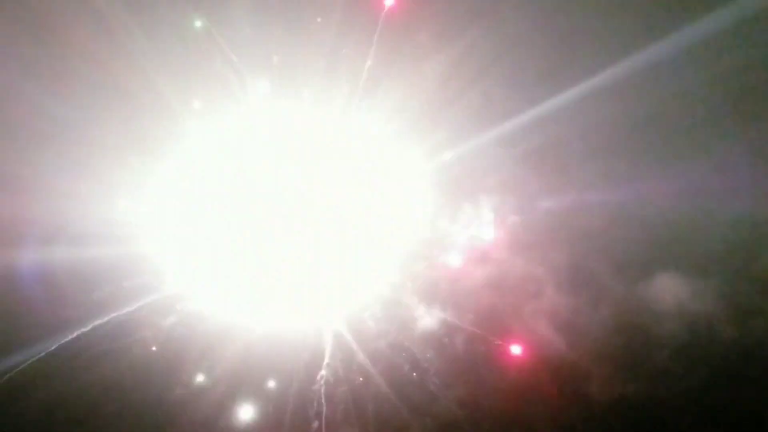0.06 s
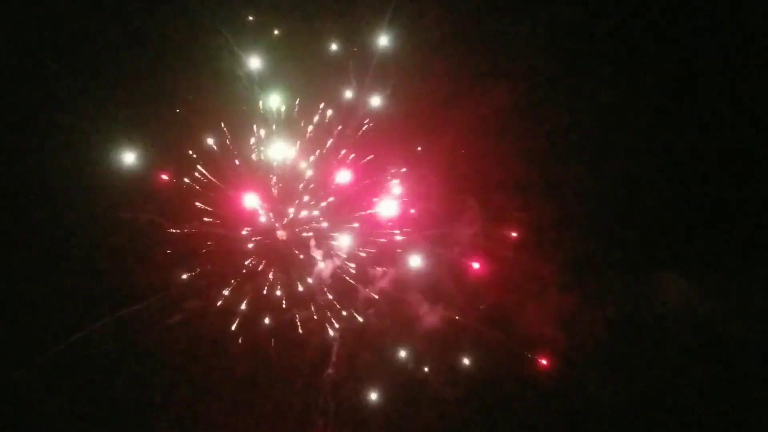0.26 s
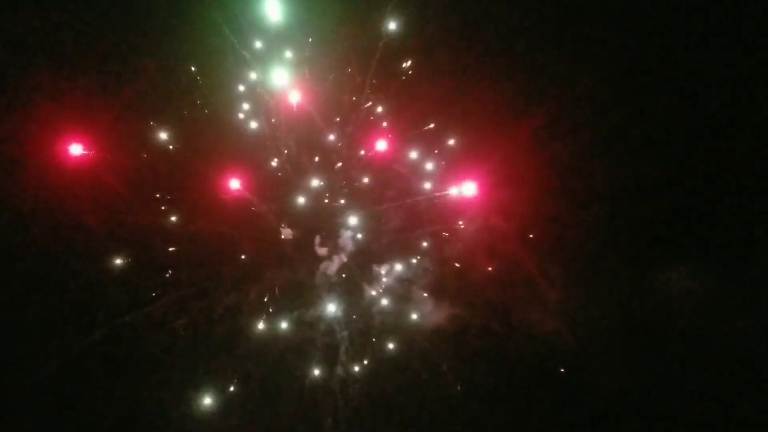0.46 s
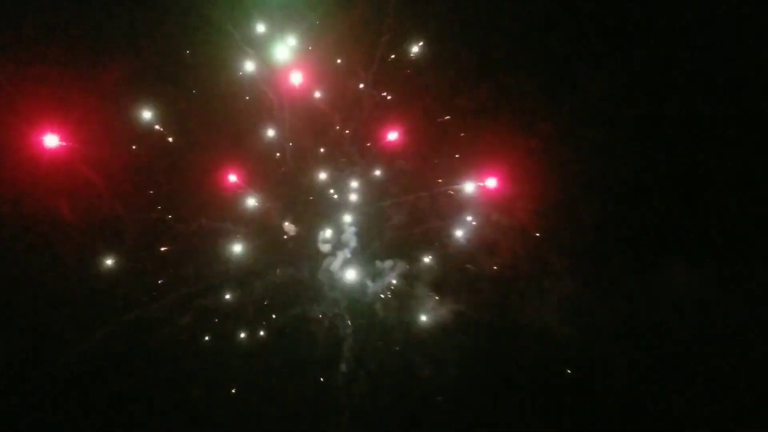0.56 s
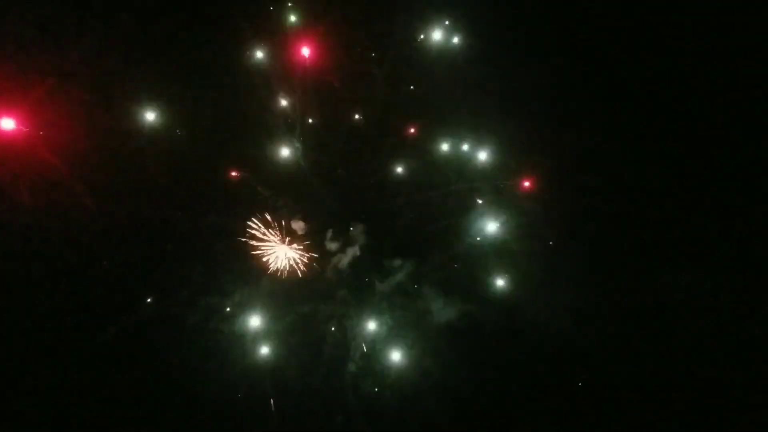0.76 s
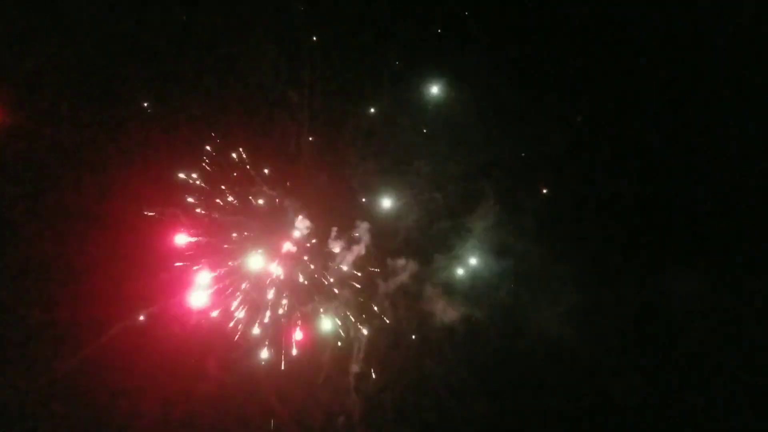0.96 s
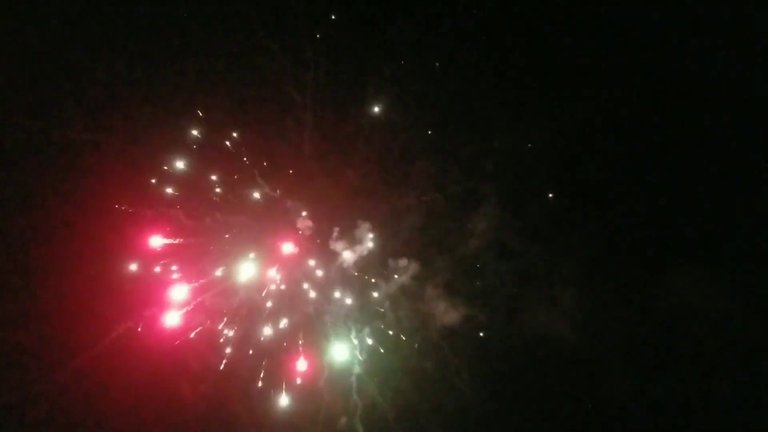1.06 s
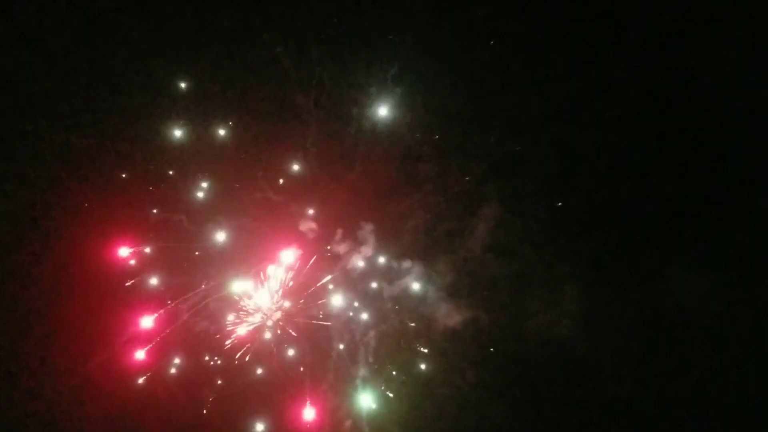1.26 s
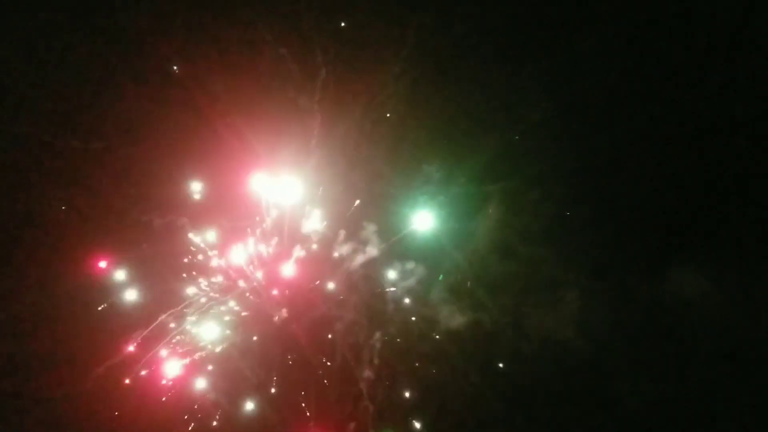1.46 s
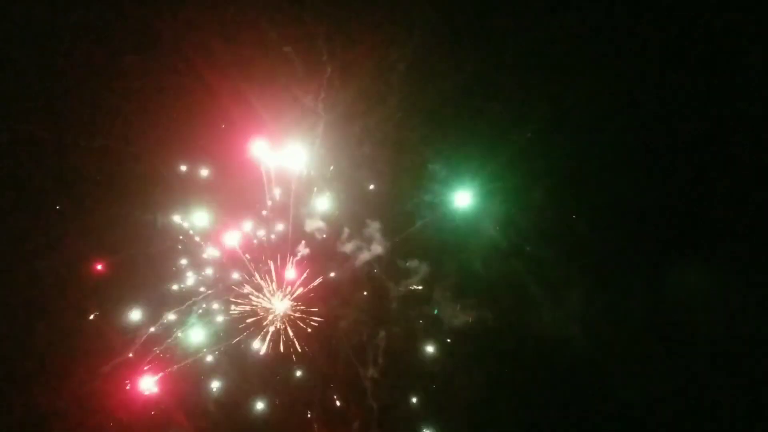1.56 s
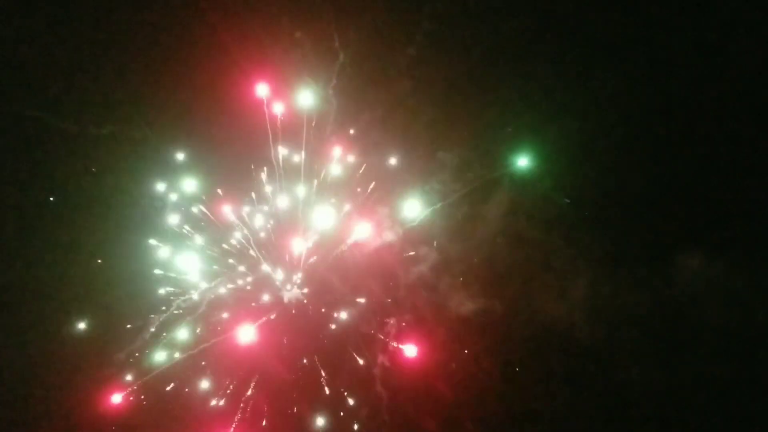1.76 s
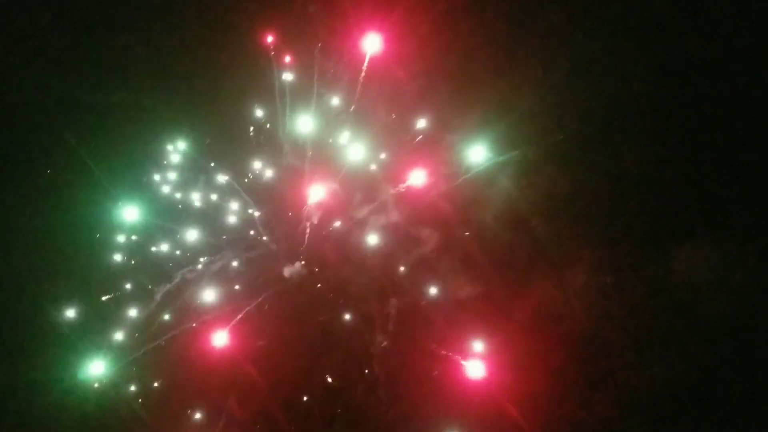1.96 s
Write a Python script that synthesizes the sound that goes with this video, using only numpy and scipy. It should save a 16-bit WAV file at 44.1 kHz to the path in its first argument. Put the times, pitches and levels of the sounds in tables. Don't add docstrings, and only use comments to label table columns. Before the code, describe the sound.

Fireworks overhead at night open with the dull, fading roll of an earlier shot. A hard crack hits at 0.2 s, slightly right, with a strong rolling echo; a softer launch thud follows at 0.5. A drier bang comes at 0.9, then faint star crackle around 1.1-1.3. The loudest crack lands at 1.37, another at 1.68, both leaning left, rumbling off trees and houses to the end.

```python
import sys
import numpy as np
from scipy import signal
from scipy.io import wavfile
from scipy.ndimage import uniform_filter1d

SR = 44100
rng = np.random.default_rng(int(sys.argv[2]) if len(sys.argv) > 2 else 0)


def invert_db(x):
    u = np.asarray(x, float) / 20
    return 10 ** u


def unload_wav(signal):
    wavfile.write(
        sys.argv[1],
        SR,
        np.round(np.clip(np.atleast_2d(signal).T, -1, 1) * 32767).astype(np.int16),
    )


N = 88200

# (time [s], peak [dB], ground echo lag [ms], left later by [ms], left minus right [dB])
BURSTS = [
    (0.215, 3.5, 6.32, 0.11, -3),
    (.9102, 3, 6.15, -0.0748, 0.5),
    (1.3682, 4, 5.45, -.02, 1.5),
    (1.6759, 3.5, 5.52, -0.0024, 1.5),
]
# (near scatter [dB], long tail and echoes [dB])
ROLLS = [
    (5.5, 3),
    (-1.5, 0),
    (1.5, 0.5),
    (3.5, 1),
]
# (time [s], tail level [dB])
EARLIER_BURSTS = [
    (-.42, 1.5),
    (-.15, -26),
]
# (lag [ms], left level [dB], right level [dB])
BOUNCES = [(.3, -18, -12.5), (1.3, -20.5, -7.5), (2.0, -30, -21.5), (2.95, -21.5, -4)]
# (time [s], level [dB])
SPARKS = [
    (1.1204, -63.5),
    (1.1684, -48),
    (1.1864, -60.5),
    (1.2327, -46.5),
    (1.264, -65),
]
# (frequency [Hz], near scatter [dB], near t60 [s], long tail [dB], long t60 [s])
TAIL = [(40, -59, .15, -73.5, 1.1), (128.5, -44.5, 0.1, -51.5, 2.23), (261.6, -39.5, 0.16, -48, 2.264),
        (644.5, -45.5, 0.204, -56, 1.52), (1200, -48.5, 0.302, -59.5, 1.613),
        (2600, -45.5, 0.1413, -57.5, 1.069), (6000, -52.5, 0.283, -55.5, 0.541),
        (14000, -57, 0.22, -66.5, 0.432)]
# (delay [s], spread [s], level per third octave [dB], centre
# [Hz], width [octaves])
ECHOES = [
    (0.097, 0.0222, -50, 278, 1.228),
    (.14, 0.0177, -63, 500, 2.21),
    (.25, 0.07, -67.5, 1650, 1.087),
          (.565, .018, -70, 1100, .75),
    (.62, .025, -67, 950, .75),
]
# (frequency [Hz], left-right correlation [-1..1])
LIKENESS = [(60, 0.967), (130, 0.968), (290, 0.894), (640, 0.022), (1410, -0.461), (3100, 0.284),
            (6820, -0.4), (15000, 0.85)]
# (frequency [Hz], left minus right [dB])
TAIL_PAN = [(60, -0.5), (110, -1), (200, -0.5), (380, 0), (700, -0.5), (1290, -2.5), (2380, -5), (4400, -7),
            (8120, 3), (15000, -6)]
# (frequency [Hz], level per third octave [dB])
NIGHT = [(40, -74), (120, -62.5), (280, -67), (500, -70.5), (1000, -87.5), (2500, -103), (5000, -104),
         (13000, -110)]

THUD_S = 0.5027
TAIL_TOP_HZ = 15800


def bursts():
    push_ms, ground_push_ms = 0.785, 0.8845
    close, close_power, round_hz = 0.05987, 3.042, 879.6
    body_ms, body_db, body_edge_hz = 2.045, -10.5, 3700
    ground_db, ground_left_ms, ground_edge_db, ground_edge_hz = -3.5, 0.1174, 3, 1910
    edge_db, edge_hz = -2.5, 8870
    grit_right_gain = invert_db(np.array([[0], [6]]))
    grit = unit(band(rng.standard_normal((2, N)), 2598, 2.102)) * grit_right_gain
    chance = rng.standard_normal((len(BURSTS), 2, len(BOUNCES), 2))
    out = np.zeros((2, N))
    for (s, db, ground_ms, left_ms, pan_db), luck in zip(BURSTS, chance):
        for ch, side in enumerate((1, -1)):
            is_left = ch == 0
            direct_s = s + is_left * left_ms / 1000
            body_s = direct_s + body_ms / 1000
            ground_s = direct_s + (ground_ms + is_left * ground_left_ms) / 1000
            direct = blast(direct_s, push_ms, close, round_hz, edge_db, edge_hz, close_power)
            body = blast(body_s, push_ms, close, round_hz, edge_db, body_edge_hz, close_power)
            ground = blast(ground_s, ground_push_ms, close, round_hz, ground_edge_db, ground_edge_hz, close_power)
            wave = invert_db(side * pan_db / 2) * direct + invert_db(body_db) * body + invert_db(ground_db) * ground
            wave = wave + debris(direct_s, -41.5, 4.5, grit[ch], ch, luck[0])
            wave = wave + debris(ground_s, -25.5, 2.017, grit[ch], ch, luck[1])
            out[ch] += invert_db(db) * wave
    return out


def debris(s, grit_db, grit_ms, grit, ch, luck):
    ms, on = since(s)
    out = invert_db(grit_db) * on * np.exp(-ms / grit_ms) * grit
    for (lag_ms, *side_db), (late, loud) in zip(BOUNCES, luck):
        bounce_s = s + lag_ms * (1 + 0.058 * late) / 1000
        out = out + invert_db(side_db[ch] + loud) * front(bounce_s, 2200, 0.14)
    return out


def blast(s, push_ms, close, round_hz, edge_db, edge_hz, close_power):
    ms, on = since(s)
    u = np.minimum(ms / push_ms, 30)
    body = lowpass(on * (1 - u) * np.exp(-close * u ** close_power), round_hz)
    return lowpass(body, edge_hz) + invert_db(edge_db) * front(s, edge_hz, 0.136)


def front(s, hz, fall_ms):
    ms, on = since(s)
    step = on * (1 - 0.5 * ms / fall_ms) * np.exp(-ms / fall_ms)
    return lowpass(lowpass(step, hz), hz)


def thud():
    def one(s):
        return blast(s, 0.506, 0.276, 898, 2.66, 12300, 2.496)

    rise_ms = 0.39
    body = invert_db(-22.5) * one(THUD_S + 0.0023)
    ground = invert_db(-17) * lowpass(one(THUD_S + 0.00324), 890)
    wave = one(THUD_S) + body + ground
    return invert_db(-8) * uniform_filter1d(wave, int(rise_ms * SR / 1000))


def sparks():
    crack_noise, tick_noise = rng.standard_normal((2, 2, N))
    cracks = 0
    for s, db in SPARKS:
        ms, on = since(s)
        cracks = cracks + invert_db(db - 4.5) * on * np.exp(-ms / 0.94)
    ms, on = since(THUD_S - 0.0002)
    tick = invert_db(-50.5) * on * np.exp(-ms / 2.58)
    crack_noise = crack_noise + crack_noise[:1]
    return cracks * unit(band(crack_noise, 2820, 0.98)) + tick * unit(band(tick_noise, 8000, 1.1))


def roll_power(age, hz, close_db, walls_db, pace):
    near_db, near_t60, long_db, long_t60 = (table(TAIL, hz, col=k) for k in range(1, 5))
    near = invert_db(2 * (near_db + close_db - 60 * age / near_t60))
    long = invert_db(2 * (long_db - 60 * age / long_t60)) * (1 - np.exp(-age / 0.023))
    power = near + long
    for lag, spread, echo_db, echo_hz, width in ECHOES:
        colour_db = -6 * (np.log2(hz / echo_hz) / width) ** 2
        swell = np.exp(-((age - pace * lag) / spread) ** 2)
        power = power + invert_db(2 * (walls_db + echo_db + colour_db)) * swell
    return power


def surroundings():
    t = np.arange(0, N + 64, 32) / SR
    # (time [s], level [dB], tilt [dB/octave], echo lift [dB], echo pace, near scatter lift [dB])
    shots = [(row[0] + 0.003, db, 0, 0, 1, close_db - db) for row, (close_db, db) in zip(BURSTS, ROLLS)]
    shots += [(s, db, 0, 0, 1, 0) for s, db in EARLIER_BURSTS]
    shots += [(THUD_S + 0.0033, -18, -2.5, 6, 0.426, -3)]
    lumps = walk(60)
    grains = [walk(120) for _ in range(3)]
    sides = np.array([[1], [-1]])
    out = 0
    for hz in 40 * 2 ** np.arange(0, 8.8, 1 / 3):
        octaves = np.log2(max(hz / 300, 1))
        power = invert_db(2 * table(NIGHT, hz)) + 0 * t
        for s, db, tilt_db, walls_db, pace, close_db in shots:
            age = np.clip(t - s, 0, None)
            rolled = roll_power(age, hz, close_db, walls_db, pace)
            power += (t > s) * rolled * invert_db(2 * (db + tilt_db * octaves))
        mid, side = unit(band(rng.standard_normal((2, N)), hz, 1 / 3))
        c = np.clip(table(LIKENESS, hz), -0.95, 0.98)
        pair = np.sqrt((1 + c) / 2) * mid + np.sqrt((1 - c) / 2) * side * sides
        pan = invert_db(table(TAIL_PAN, hz) / 2 * sides)
        lump_db = 3 * lumps / (1 + (hz / 500) ** 2)
        flicker_db = 1.0 * walk(30)
        grain_db = 3 * grains[int(octaves) % 3] * np.exp(-np.log2(hz / 2000) ** 2 / 3)
        level = np.interp(np.arange(N) / SR, t, np.sqrt(power))
        out = out + pair * pan * level * invert_db(lump_db + flicker_db + grain_db)
    return cut(out, TAIL_TOP_HZ)


def since(s):
    ms = (np.arange(N) / SR - s) * 1000
    return np.clip(ms, 0, None), np.clip(ms * SR / 1000 + 0.5, 0, 1)


def walk(rate):
    k = int(SR / 200)
    steps = uniform_filter1d(rng.standard_normal(N // k + 2), max(int(200 / rate), 1))
    return np.interp(np.arange(N) / k, np.arange(len(steps)), unit(steps))


def table(rows, hz, col=1):
    rows = np.array(rows, float)
    return np.interp(np.log(hz), np.log(rows[:, 0]), rows[:, col])


def unit(x):
    return x / np.sqrt(np.mean(x ** 2, axis=-1, keepdims=True))


def lowpass(x, hz):
    return signal.lfilter(*signal.butter(1, min(hz, 0.45 * SR), fs=SR), x)


def band(x, hz, octaves):
    edges = [hz * 2 ** (-octaves / 2), min(hz * 2 ** (octaves / 2), 0.47 * SR)]
    return signal.sosfilt(signal.butter(2, edges, "band", fs=SR, output="sos"), x)


def cut(x, hz):
    return signal.sosfilt(signal.ellip(8, 0.3, 60, hz, fs=SR, output="sos"), x)


def scene():
    return bursts() + thud() + sparks() + surroundings()


def top_cut(x):
    return signal.sosfilt(signal.butter(12, 16830, fs=SR, output="sos"), x)


def record(dry):
    w, q = 2 * np.pi * 93.3, 0.6403
    x = signal.lfilter(*signal.bilinear([1, 0, 0], [1, w / q, w * w], SR), dry)
    case_dip = 0.614 * signal.lfilter(*signal.iirpeak(7776, 0.833, fs=SR), x)
    port_lift = 0.705 * signal.lfilter(*signal.iirpeak(12180, 4.46, fs=SR), x)
    x = x - case_dip + port_lift
    ceiling = 4.8
    x = ceiling * np.tanh(x / ceiling)
    noise = rng.standard_normal(x.shape)
    hiss = invert_db(-91) * cut(noise, TAIL_TOP_HZ)
    rumble = invert_db(-57) * lowpass(lowpass(noise[:, ::-1], 26), 26)
    return top_cut(cut(x + hiss + rumble, 16750))


dry = scene()
out = record(dry)
unload_wav(out)
```